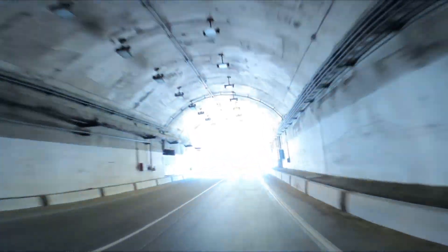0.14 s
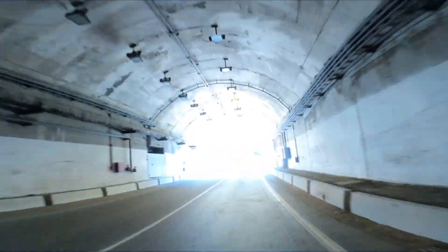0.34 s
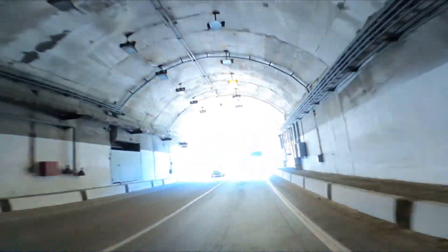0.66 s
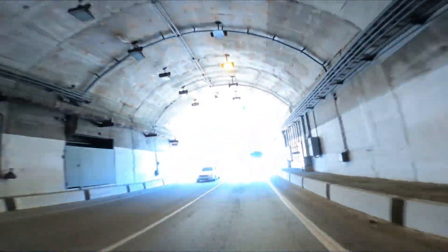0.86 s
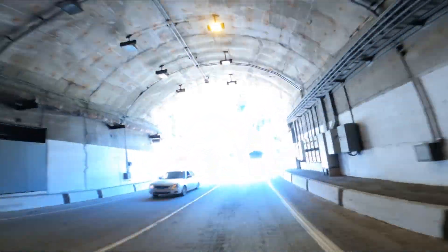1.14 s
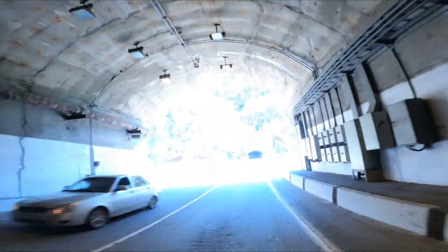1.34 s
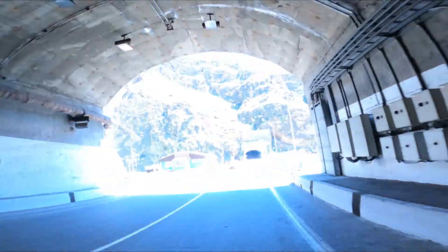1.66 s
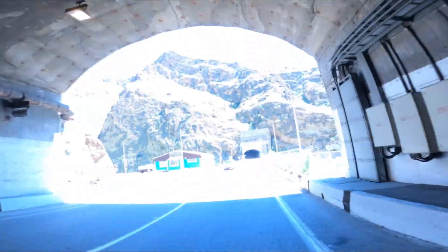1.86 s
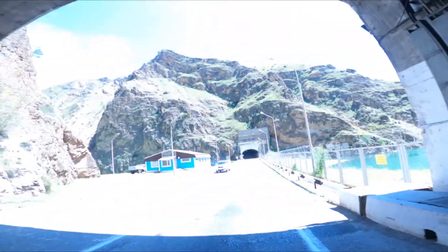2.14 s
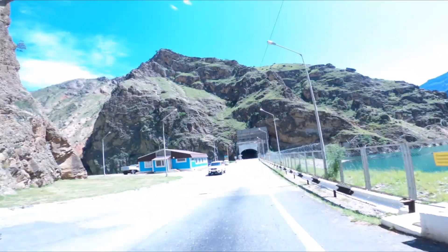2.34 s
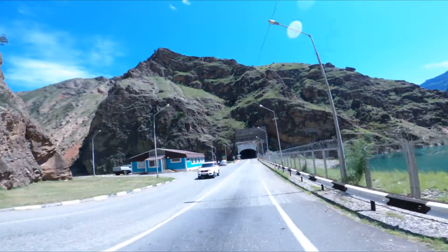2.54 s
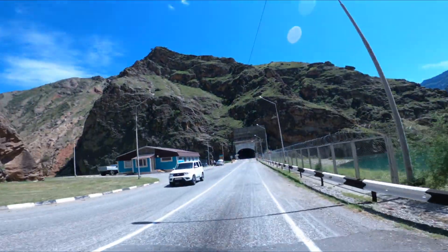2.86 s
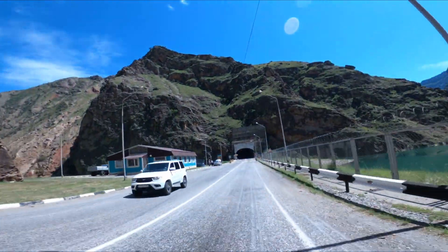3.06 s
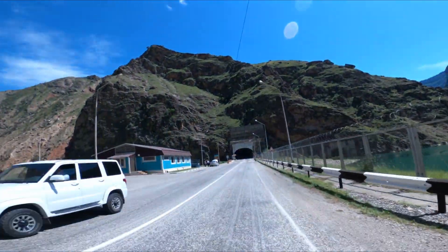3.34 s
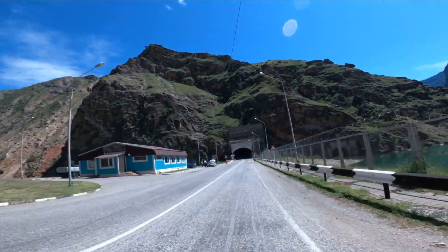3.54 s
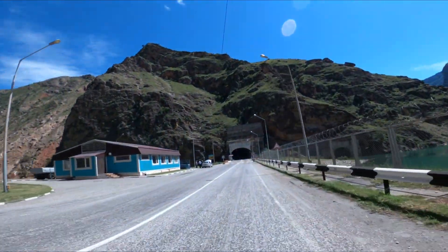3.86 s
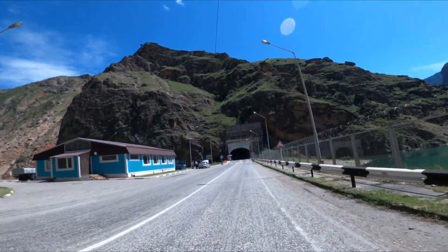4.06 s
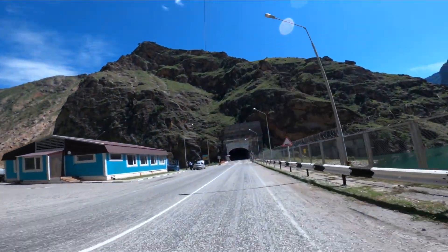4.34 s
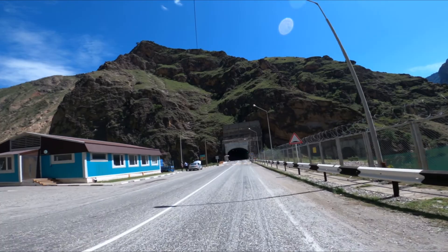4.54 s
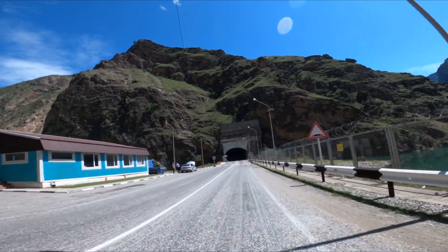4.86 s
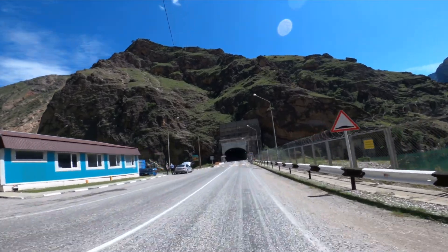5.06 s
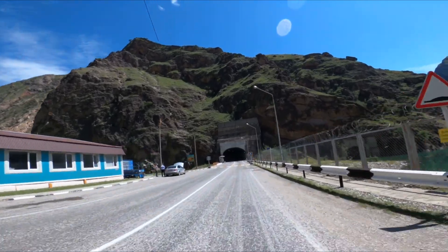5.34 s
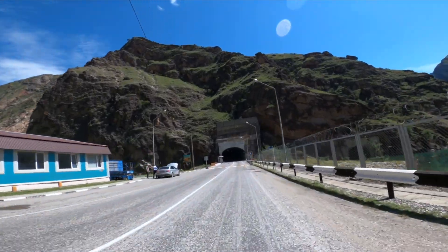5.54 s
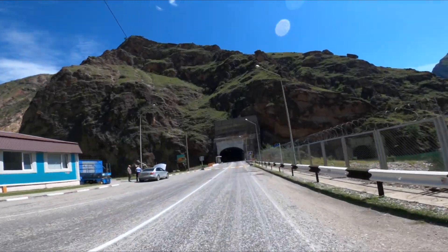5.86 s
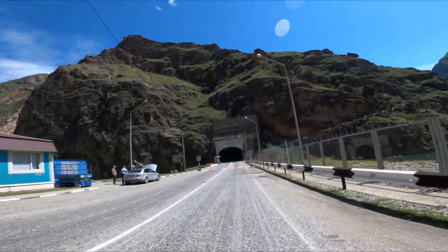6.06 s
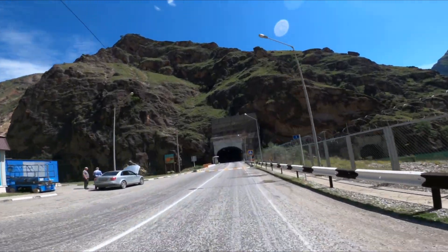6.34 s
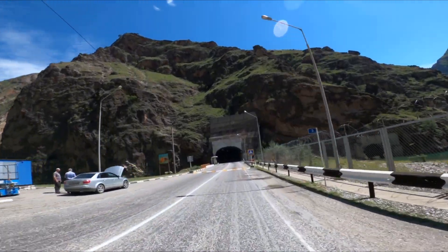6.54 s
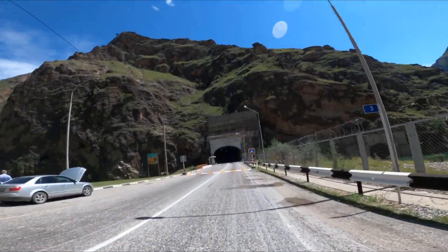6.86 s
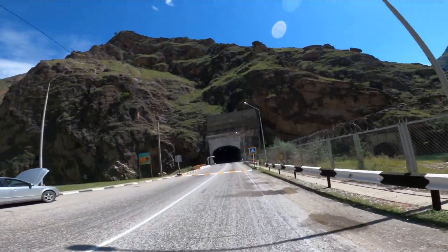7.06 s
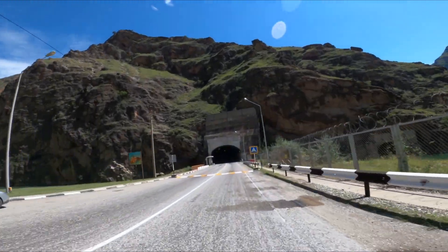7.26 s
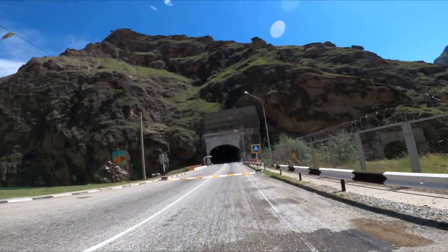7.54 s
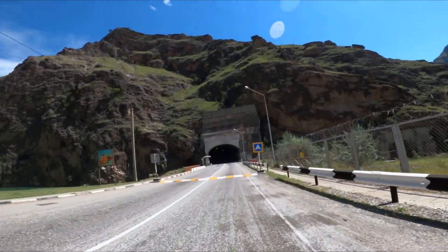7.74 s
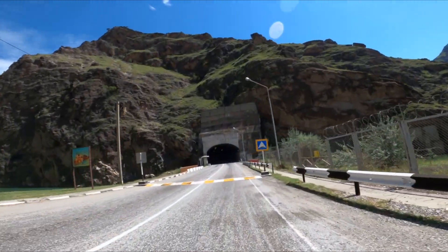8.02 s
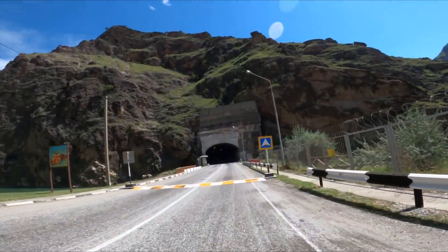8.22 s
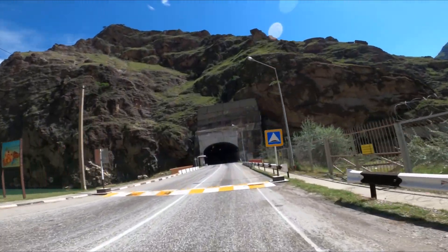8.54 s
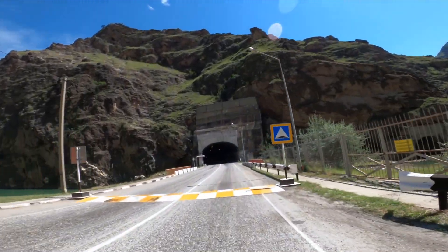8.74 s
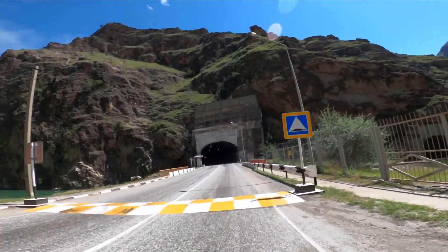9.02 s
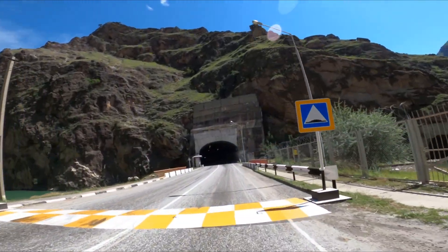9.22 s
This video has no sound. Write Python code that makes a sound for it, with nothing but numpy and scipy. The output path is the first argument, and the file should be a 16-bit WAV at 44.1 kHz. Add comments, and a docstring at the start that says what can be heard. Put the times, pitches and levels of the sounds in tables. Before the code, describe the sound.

A car roars out of a road tunnel with heavy wind buffeting, engine hum and tyre noise, passes oncoming cars, then slows in open air.

```python
"""Road tunnel, then open air: a small camera rides outside a car that drives out and slows down.
Wind buffets the microphone and tyres roar (shaped noise); the tunnel walls return the roar while the
engine hums (harmonics of the firing rate). Fuzzy whistles (narrow noise bands) come and go, two oncoming
cars sweep past (noise with 1/distance swell and Doppler), air hisses, and brakes rub faintly at the end."""
import sys
import numpy as np
from scipy import signal
from scipy.fft import rfft, irfft, next_fast_len
from scipy.io import wavfile
from scipy.ndimage import uniform_filter1d

SR = 44100
rng = np.random.default_rng(int(sys.argv[2]) if len(sys.argv) > 2 else 0)


def to_wav(sig):
    """Store sig (one row per channel, or 1-D mono) as 16-bit WAV at the path in sys.argv[1].

    Samples outside -1..1 are clipped; the rate is SR.
    """
    pcm = np.clip(np.atleast_2d(sig), -1, 1) * 32767
    pcm = np.round(pcm).astype(np.int16)
    wavfile.write(sys.argv[1], SR, pcm.T)  # frames by channels


N = 414099

# Spectrum tables: f/Hz, relative density level/dB. Bump tables: centre t/s, level change/dB.
# Wind buffeting: t/s, thud level/dB, eddy level/dB, eddy pitch factor/1, thud pitch factor/1
WIND = [(0, -20.5, -30, 0.89, 1.0), (.5, -21.5, -28, 1.17, 1.1), (1, -19.5, -22.5, 1.08, 1.0),
        (1.9, -20.5, -23.5, 1.1, 1.2), (2.4, -21, -25, 1.08, 1.0), (3.5, -19.5, -23, 0.91, 1.05),
        (4.2, -20, -23.5, 0.98, 1.08), (4.7, -19, -24, 1.06, 0.99), (5.2, -20.5, -22.5, 1.01, 0.92),
        (5.7, -18, -24.5, 0.99, .95), (6.2, -18.5, -26.5, 1.05, 1.05), (6.6, -20.5, -25, 1.01, .95),
        (7, -20, -24.5, 0.89, 1.1), (7.5, -19.5, -26, 0.88, 1.02), (8, -19, -28, 0.88, 0.93),
        (8.35, -19, -25, .9, .9), (8.55, -20.5, -25.5, 1.04, 0.87), (8.7, -20.5, -24.5, .85, 0.99),
        (8.9, -21, -25, 0.73, 0.86), (9.39, -21, -28.5, 0.83, 0.98)]
# Slow wind thuds: f/Hz, density level/dB
THUD_SPECTRUM = [(3, -30), (8, -12), (30, -2.5), (55, -1), (95, -3), (130, -9), (180, -25)]
# Quicker wind eddies: f/Hz, density level/dB
EDDY_SPECTRUM = [(80, -24), (130, 0), (170, -1.5), (210, -3.5), (270, -5), (310, -8.5), (350, -16),
                 (450, -34.5), (600, -47)]
# Thuds drop out or surge: t/s, level change/dB
THUD_BUMPS = [(.29, -16), (.96, 6.5), (1.41, -3), (1.78, 2), (1.9, -1.5), (2.38, 3.5), (3.03, -10), (4, -9),
              (4.43, -4), (5.47, 0), (5.7, -3.5), (6.63, 2), (6.73, -3), (7.2, 2), (7.5, 2.5), (8.03, -5),
              (8.47, 2.5)]
# Eddies surge or slacken: t/s, level change/dB
EDDY_BUMPS = [(.21, 11.5), (.29, -1), (.63, -2.5), (.97, 4), (1.31, 1), (1.42, -1.5), (1.72, 3),
              (1.84, 1.5), (1.93, 6), (2.03, 0), (2.95, 4.5), (3.5, 3), (3.9, 3), (4, -2), (4.22, 0.5),
              (4.3, -2), (4.5, 2.5), (4.7, 1.5), (5.27, 3), (5.5, -3), (5.74, -5.5), (5.87, 0.5),
              (6.1, 2.5), (6.6, 4), (6.9, 2), (7.1, 2.5), (7.3, -0.5), (7.45, 4), (8.05, -3.5), (8.5, 2.5),
              (8.6, 4), (8.93, -1.5)]
THUD_BUMP_S, EDDY_BUMP_S = .022, .035  # standard deviations

# Tyre roar and top treble, fading overall, with a rise as the second car passes:
# t/s, tyre roar level/dB, top treble level/dB
ROAD = [(0, -26, -58.5), (.5, -29, -61), (.88, -27, -58.5), (1.5, -28.5, -61.5), (1.7, -28.5, -63),
        (2.6, -29.5, -63.5), (3.18, -30.5, -65), (3.36, -27.5, -63.5), (3.65, -29.5, -61.5),
        (4, -32, -64.5), (4.7, -33.5, -65.5), (5.4, -34, -65), (5.7, -34, -67), (6.2, -35.5, -67),
        (7.1, -35.5, -69.5), (7.8, -39, -72), (8.42, -36.5, -68.5), (8.75, -39.5, -71), (9.39, -39, -73)]
# Own tyre roar: f/Hz, density level/dB
TYRE_SPECTRUM = [(150, -40), (260, -2), (350, 3.5), (500, 0.5), (680, -3.5), (950, -5), (1300, -10.5),
                 (1700, -15.5), (2100, -19), (3000, -26), (5000, -35)]
# Coarser or smoother asphalt under the tyres: t/s, level change/dB
ASPHALT_BUMPS = [(1.95, -1.5), (4.2, 0), (5.05, -0.5), (5.3, 2), (5.9, 0.5), (6.05, 2.5), (6.25, 1.5),
                 (7.4, 2), (7.8, 1), (8.45, 1)]
ASPHALT_BUMP_S = 0.04
# Roar thrown back by the tunnel walls: t/s, level/dB
WALL_LEVEL = [(0, -37.5), (.4, -32.5), (.65, -29.5), (.88, -29.5), (1.05, -33), (1.3, -33.5), (1.6, -35.5),
              (1.85, -36), (2.05, -41.5), (2.5, -36.5), (2.9, -39), (3.4, -51), (3.9, -74)]
# Roar thrown back by the tunnel walls: f/Hz, density level/dB
WALL_SPECTRUM = [(150, -8), (400, -5.5), (650, -8), (820, 1), (950, 4), (1150, -1.5), (1400, -6.5),
                 (2200, -15.5), (3500, -19.5), (5400, -29.5), (6200, -31), (9000, -41)]
# Air hiss: f/Hz, density level/dB
HISS_SPECTRUM = [(1500, -12.5), (2500, -0.5), (4000, -3.5), (5500, -6.5), (5900, -9.5), (7000, -23.5),
                 (9000, -30.5), (12500, -58.5)]
HISS_DB, HISS_DB_PER_TOP_DB = -54, 0.82
CRUISE_TOP_DB = -66  # top treble level at which the hiss has HISS_DB
# Flickering top treble: f/Hz, density level/dB
TOP_SPECTRUM = [(5500, -2.5), (6500, -0.5), (8700, -8), (9500, -10.5), (11000, -18.5), (12500, -26.5),
                (14000, -46.5)]
# High band that comes and goes: t/s, f/Hz, level/dB
SHIMMER = [(.1, 8370, -76), (.6, 8400, -69), (1.55, 8300, -69), (1.65, 8400, -77), (3.2, 8300, -78),
           (3.45, 8300, -64), (4, 8410, -78), (6.8, 8500, -79.5), (7.4, 8400, -89)]
# Brief dips of top treble and shimmer: t/s, level change/dB
TOP_DIPS = [(2.22, -3), (4.13, -5), (4.58, -2), (5.12, -5), (5.54, -6), (5.93, -2), (6.45, -2), (6.69, -1),
            (6.98, -5)]
TOP_DIP_S = .04

# Engine hum: t/s, firing f/Hz, level/dB, lift of the lowest order/dB
HUM = [(0, 78, -30, 2), (.3, 77.5, -25.5, -10), (.9, 79, -25, -8), (1.2, 80, -25, 2), (1.5, 80.5, -25, 3),
       (1.9, 81.5, -24, 1), (2.15, 82, -33, 4), (2.45, 84, -32, 7), (2.9, 84.5, -32, 7), (3.2, 84, -55, 2)]
# Firing orders: multiple of firing rate/1, level/dB
FIRING_ORDERS = [(1, 1.5), (2, -1), (3, -10), (4, -14)]
# Low band that booms in the tunnel: t/s, f/Hz, level/dB
DRONE = [(0, 64, -30), (.24, 65, -24), (.32, 64, -40), (.55, 65.5, -26), (.75, 65.5, -25), (.95, 67, -45)]
# Fuzzy whistle in the tunnel: t/s, f/Hz, level/dB
TUNNEL_WHISTLE = [(.3, 3720, -70), (.55, 3610, -55), (.72, 3590, -50.5), (1, 3600, -56), (1.2, 3580, -54),
                  (1.5, 3630, -57), (1.7, 3670, -75)]
# Oncoming cars: nearest t/s, level/dB, speed past the camera/(m/s), side distance/m,
# side-on tread hiss level against the roar/dB
ONCOMING = [(1.55, -42.5, 25, 4.4, -16), (3.51, -33.5, 19, 3.5, -3.5)]
# Roar of an oncoming car: f/Hz, density level/dB
PASSING_SPECTRUM = [(250, -23), (500, -10), (700, 1.5), (900, 5), (1250, -2), (1800, -15.5), (2500, -21.5),
                    (4500, -29.5), (6500, -34), (8300, -36.5), (10500, -51), (13500, -72.5)]
# Tread hiss heard side-on: f/Hz, density level/dB
ABREAST_SPECTRUM = [(1000, -14), (1500, 0), (1900, 0.5), (2600, -6), (3500, -12), (5000, -20), (7000, -30),
                    (9500, -36), (11500, -55)]
# Whistle that climbs as the second car nears: t/s, f/Hz, level/dB
CLIMBING_WHISTLE = [(2.95, 2600, -53), (3.1, 2750, -48), (3.25, 3410, -48.5), (3.36, 4390, -54),
                    (3.5, 5000, -69), (3.6, 5200, -70)]
# Fuzzy whistle in open air: t/s, f/Hz, level/dB
OPEN_WHISTLE = [(4.1, 1560, -69), (4.4, 1530, -52.5), (5, 1512, -55), (5.8, 1467, -54), (6.2, 1460, -72)]
# Brake rub: t/s, whine f/Hz, whine level/dB, wide hiss level/dB
BRAKE_RUB = [(7.8, 2385, -80, -78), (8.05, 2430, -62, -66), (8.15, 2420, -65, -63), (8.25, 2360, -61, -61),
             (8.36, 2400, -65, -58), (8.5, 2480, -63, -54), (8.67, 2440, -58.5, -57), (8.8, 2410, -64, -56),
             (8.95, 2365, -57, -57), (9.08, 2345, -60, -52), (9.17, 2390, -62, -52),
             (9.3, 2420, -57.5, -51), (9.39, 2430, -65, -53)]
# Brake pad hiss: f/Hz, density level/dB
PAD_SPECTRUM = [(900, -20.5), (1300, 0), (1800, 0), (3000, -3.5), (4200, -10), (5500, -29.5)]

# Microphone port resonances: f/Hz, width/Hz, lift/dB
PORT_RESONANCES = [(5240, 610, 6), (8300, 700, 1.5)]
EDGE_HZ = 14200
SOUND_SPEED_M_S = 343


def gain_of(db):
    """Decibels to amplitude."""
    return 10 ** (np.asarray(db) / 20)


def evened(x):
    """Scales to rms 1."""
    return x / np.sqrt(np.mean(x ** 2) + 1e-20)


def smoothed_twice(x, size):
    """Two moving averages in a row."""
    return uniform_filter1d(uniform_filter1d(x, size=size), size=size)


def curve(rows, column):
    """Reads one column of a time table at every sample."""
    rows = np.array(rows)
    return np.interp(np.arange(N) / SR, rows[:, 0], rows[:, column])


def bumps(rows, width_s):
    """Sum of bell-shaped level changes, in dB."""
    t_s = np.arange(0, N / SR, .002)
    sum_db = sum(db * np.exp(-((t_s - s) / width_s) ** 2 / 2) for s, db in rows)
    return np.interp(np.arange(N) / SR, t_s, sum_db)


def steadied(x, share, size):
    """Takes a share of the chance swells out of a noise, rms 1."""
    power = smoothed_twice(evened(x) ** 2, size)
    return evened(x / (power + .02) ** (np.clip(share, 0, 1) / 2))


def noise(points, patchy_db, flicker_db, size=1024, stretch=lambda t: 1 + 0 * t):
    """Random short-time spectra with drifting patches and a flicker shared by all bins, rms 1."""
    f_hz, density_db = np.transpose(points)
    hz = np.fft.rfftfreq(size, 1 / SR)[:, None]
    t_s = np.arange(4 * N // size + 5) * size / 4 / SR
    # bins well above the table stay silent
    used = min(len(hz), 64 * int(np.searchsorted(hz[:, 0], 1.2 * f_hz[-1]) / 64 + 1))
    log_f = np.log(hz / stretch(t_s) + 1)[:used]
    shape_db = np.interp(log_f, np.log(f_hz + 1), density_db, left=-90, right=-120)
    draws = rng.standard_normal((3, len(t_s), used), np.float32)
    re, im, patches = draws.transpose(0, 2, 1)
    patches = uniform_filter1d(patches, size=12, axis=0)
    patches = evened(uniform_filter1d(patches, size=12, axis=1))
    flicker = evened(uniform_filter1d(rng.standard_normal(len(t_s)), size=5))
    level_db = shape_db + patchy_db * patches + flicker_db * flicker
    spectra = np.zeros((len(hz), len(t_s)), np.complex64)
    spectra[:used] = (re + 1j * im) * gain_of(level_db)
    return evened(signal.istft(spectra, nperseg=size, noverlap=3 * size // 4)[1][:N])


def whistle(rows, width_hz):
    """Lowpassed complex noise shifted up to a narrow band that follows the table."""
    pole = np.exp(-np.pi * width_hz / SR)
    white = [1, 1j] @ rng.standard_normal((N, 2)).T
    slow = signal.lfilter([1], np.poly([pole, pole]), white)
    carrier = np.exp(2j * np.pi * np.cumsum(curve(rows, 1)) / SR)
    band = steadied((slow * carrier).real, share=.6, size=1200)
    t_s = np.arange(N) / SR
    return band * gain_of(curve(rows, 2)) * (t_s >= rows[0][0]) * (t_s <= rows[-1][0])


def wind():
    """Turbulent pressure at the microphone port: slow thuds and quicker eddies, drifting in pitch."""
    def pitch(column):
        return lambda t: np.interp(t, *np.array(WIND)[:, [0, column]].T)
    thuds = noise(THUD_SPECTRUM, patchy_db=-2.0, flicker_db=0.0, size=4096, stretch=pitch(column=4))
    thuds = steadied(thuds, share=0.78, size=3500)
    eddies = noise(EDDY_SPECTRUM, patchy_db=2.0, flicker_db=1.76, stretch=pitch(column=3))
    eddies = steadied(eddies, share=0.49, size=3000)
    thud_db = curve(WIND, 1) + bumps(THUD_BUMPS, THUD_BUMP_S)
    eddy_db = curve(WIND, 2) + bumps(EDDY_BUMPS, EDDY_BUMP_S)
    return thuds * gain_of(thud_db) + eddies * gain_of(eddy_db)


def own_tyres():
    """Tread on asphalt: broadband roar whose level follows a table and varies with the surface."""
    level_db = curve(ROAD, 1) + bumps(ASPHALT_BUMPS, ASPHALT_BUMP_S)
    return noise(TYRE_SPECTRUM, patchy_db=0.7, flicker_db=-0.2) * gain_of(level_db)


def wall_return():
    """Roar thrown back by the tunnel walls: a separate noise with its own spectrum and level."""
    return noise(WALL_SPECTRUM, patchy_db=1.2, flicker_db=0.9) * gain_of(curve(WALL_LEVEL, 1))


def air_hiss():
    """Air round the housing: hiss tied to the top treble level, plus a flickering top and a shimmer."""
    top_db = curve(ROAD, column=2)
    hiss_db = HISS_DB + HISS_DB_PER_TOP_DB * (top_db - CRUISE_TOP_DB)
    hiss = noise(HISS_SPECTRUM, patchy_db=0.7, flicker_db=1.0) * gain_of(hiss_db)
    top = noise(TOP_SPECTRUM, patchy_db=0.1, flicker_db=1.4) * gain_of(top_db)
    shimmer = whistle(SHIMMER, width_hz=1600.0)
    return hiss + (top + shimmer) * gain_of(bumps(TOP_DIPS, TOP_DIP_S))


def engine():
    """Harmonics of the firing rate, wavering in pitch and level, over a lower drone."""
    pitch_waver = evened(uniform_filter1d(rng.standard_normal(N), size=9000))
    level_waver = evened(smoothed_twice(rng.standard_normal(N), size=2500))
    turns = np.cumsum(curve(HUM, 1) * (1 + .004 * pitch_waver)) / SR
    lowest_lift_db = curve(HUM, column=3)
    orders = 0
    for k, db in FIRING_ORDERS:
        order_gain = gain_of(db + (k == 1) * lowest_lift_db)
        orders = orders + order_gain * np.cos(2 * np.pi * (k * turns + rng.random()))
    return orders * gain_of(curve(HUM, 2) + 2.5 * level_waver) + whistle(DRONE, width_hz=5.)


def tunnel_whistle():
    """Fuzzy tone in the tunnel: a narrow noise band."""
    return whistle(TUNNEL_WHISTLE, width_hz=220.0)


def oncoming(nearest_s, db, speed_m_s, side_m, hiss_db):
    """Tyre noise swells as 1/distance and drops in pitch as it passes; a brighter hiss peaks abreast."""
    def doppler(t):
        along_m = speed_m_s * (t - nearest_s)
        return 1 - speed_m_s * along_m / np.hypot(along_m, side_m) / SOUND_SPEED_M_S
    near = side_m / np.hypot(speed_m_s * (np.arange(N) / SR - nearest_s), side_m)
    roar = noise(PASSING_SPECTRUM, patchy_db=0.6, flicker_db=0.4, stretch=doppler)
    hiss = noise(ABREAST_SPECTRUM, patchy_db=0.6, flicker_db=0.4, stretch=doppler)
    return gain_of(db) * near * (roar + gain_of(hiss_db) * near ** 2 * hiss)


def climbing_whistle():
    """Broad fuzzy tone: a noise band that climbs as the second car nears."""
    return whistle(CLIMBING_WHISTLE, width_hz=1100.)


def open_whistle():
    """Fuzzy tone in open air: a narrow noise band that sinks slowly."""
    return whistle(OPEN_WHISTLE, width_hz=45.0)


def brakes():
    """Pads rub on the discs: a thin whine band inside a wide hiss."""
    whine = whistle(BRAKE_RUB, width_hz=45.)
    hiss = noise(PAD_SPECTRUM, patchy_db=0.0, flicker_db=2.0) * gain_of(curve(BRAKE_RUB, column=3))
    return whine + hiss


def scene():
    """All sources at the microphone port, one channel."""
    own_car = wind() + own_tyres() + wall_return() + air_hiss() + engine()
    cars = sum(oncoming(*row) for row in ONCOMING)
    whistles = tunnel_whistle() + climbing_whistle() + open_whistle()
    return (own_car + cars + whistles + brakes())[None]


def record(dry):
    """Housing resonances, soft overload of the big gusts, band limit."""
    size = next_fast_len(N)
    hz = np.fft.rfftfreq(size, 1 / SR)
    lift_db = sum(db / (1 + (2 * (hz - f) / width) ** 2) for f, width, db in PORT_RESONANCES)
    coloured = irfft(rfft(dry, size) * gain_of(lift_db), size)[:, :N]
    squeezed = 0.66 * np.tanh(coloured / 0.6)
    lowpass = signal.firwin(511, EDGE_HZ, window=("kaiser", 9), fs=SR)
    return signal.oaconvolve(squeezed, lowpass[None], "same")


dry = scene()
out = record(dry)
to_wav(out)
```